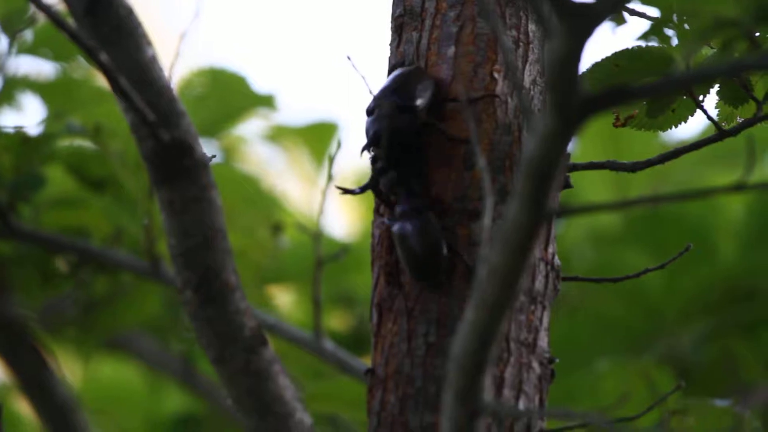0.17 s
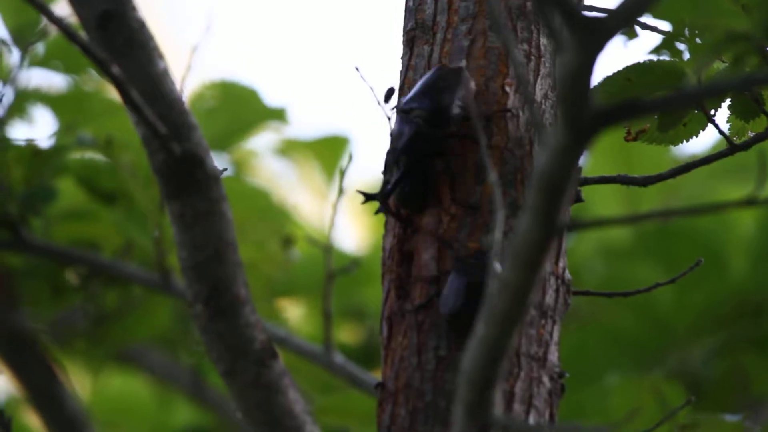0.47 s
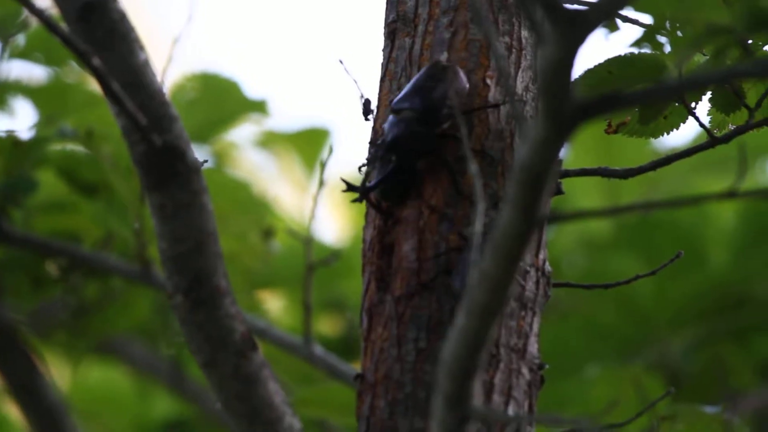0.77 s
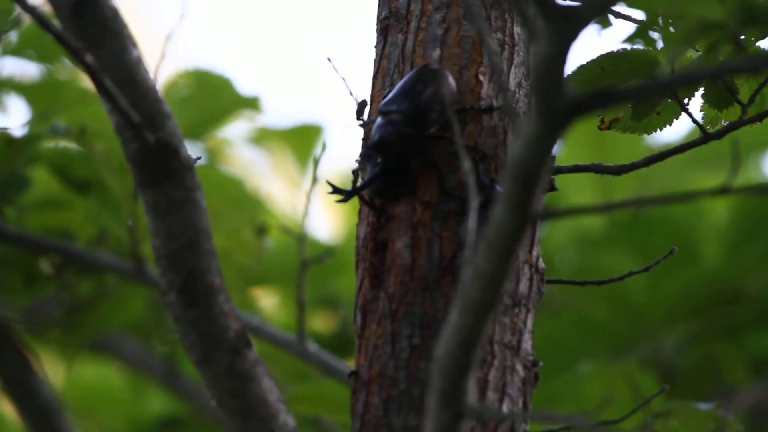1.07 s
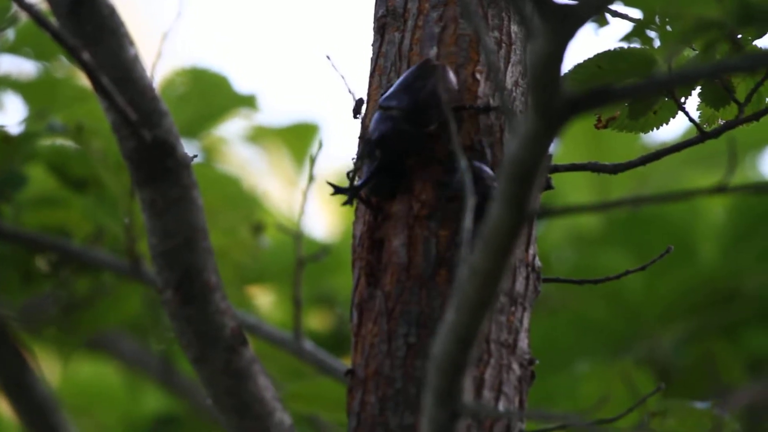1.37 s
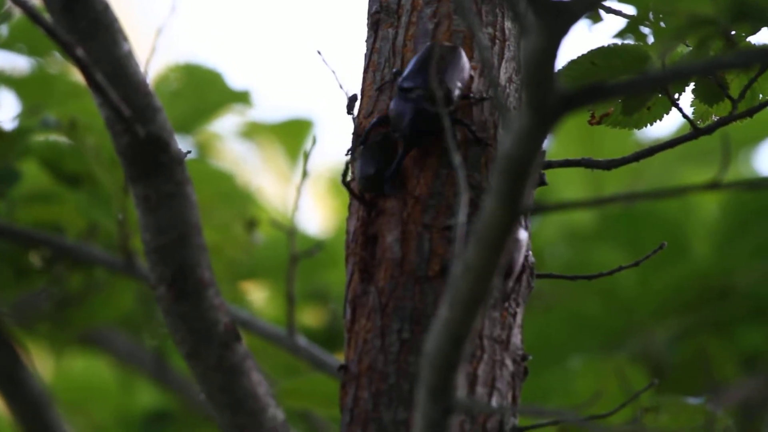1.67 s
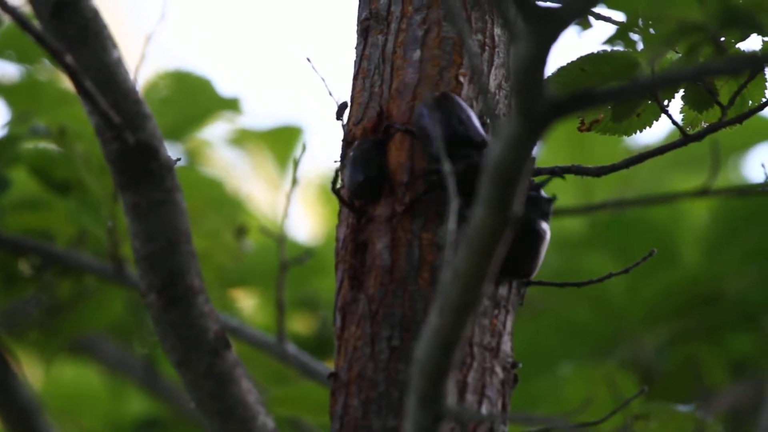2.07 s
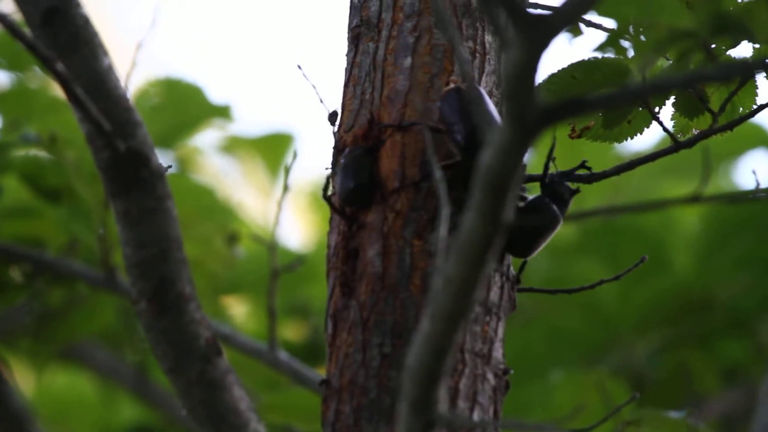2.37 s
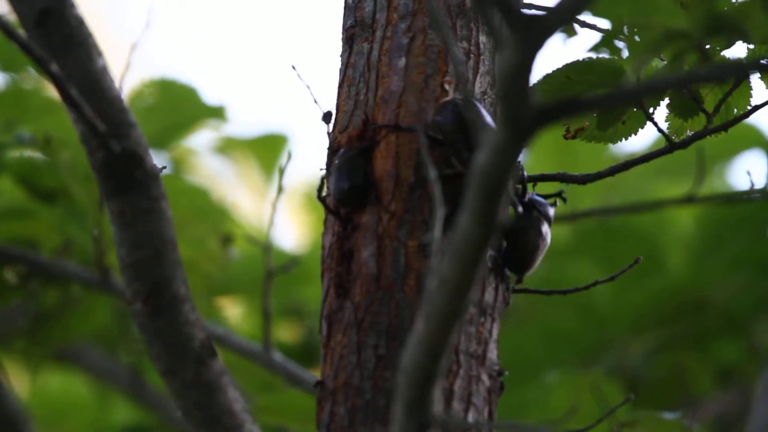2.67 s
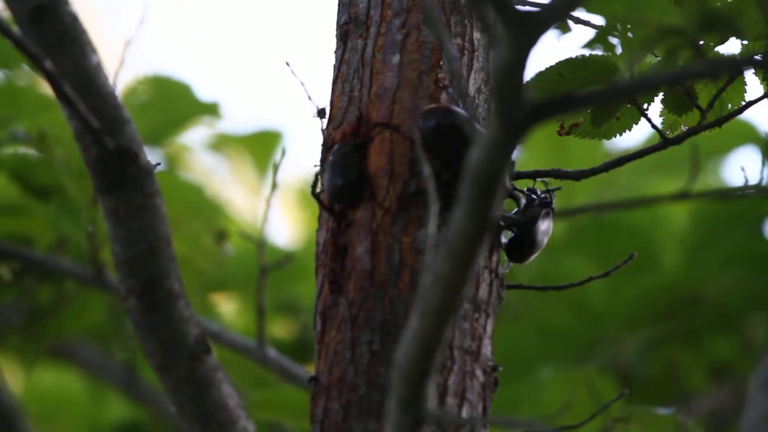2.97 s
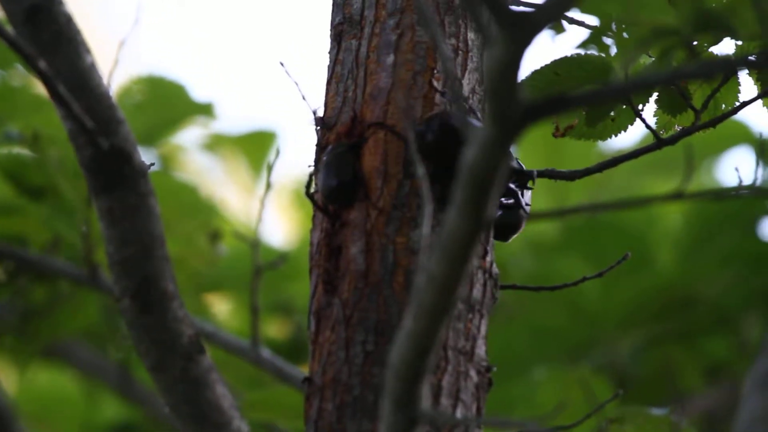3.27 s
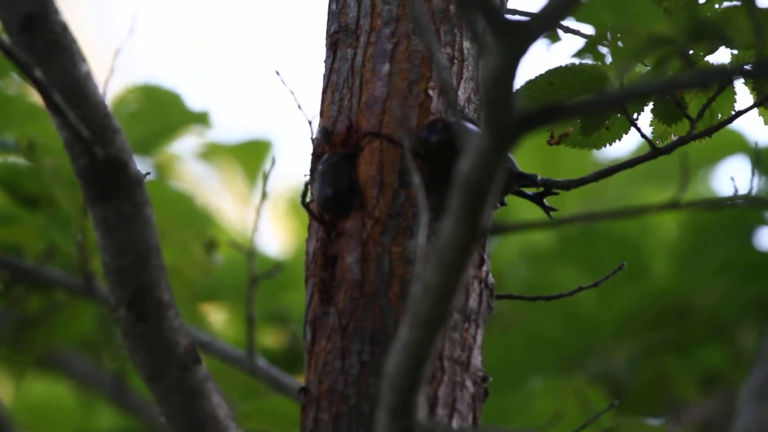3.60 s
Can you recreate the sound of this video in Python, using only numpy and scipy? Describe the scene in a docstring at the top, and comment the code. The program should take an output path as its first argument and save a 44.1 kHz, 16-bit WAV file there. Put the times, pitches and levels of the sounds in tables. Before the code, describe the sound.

Katydids rasp and buzz in a dense high-pitched chorus over faint leaf hiss in summer woods

```python
"""A summer wood through a small mono camera microphone. Out of a brief silence come leaf hiss, a short rustle,
camera-body rumble and a far katydid chorus of dense tooth clicks; cricket trills are narrow resonant bands.
A near katydid soon throbs over it in bursts of sparser clicks. A slower singer then swells to nine strokes a
second, wavering wing tones over a scrape. Two soft knocks excite the body's hum at 1.4 and 2.7 s; near the end
the rasp drops away."""
import sys
import numpy as np
from scipy import signal
from scipy.fft import rfft, irfft
from scipy.io import wavfile

SR = 44100
rng = np.random.default_rng(int(sys.argv[2]) if len(sys.argv) > 2 else 0)


def file_out(sig):
    """Save sig as 16-bit WAV at sys.argv[1]."""
    # one column per channel
    cols = np.atleast_2d(sig).T
    # limit, then scale
    lim = np.clip(cols, -1, 1)
    pcm = np.round(lim * 32767).astype(np.int16)
    wavfile.write(sys.argv[1], SR, pcm)


def convert_level_to_amplitude(level_db):
    """Map a level in decibels to its linear amplitude factor."""
    exponent = np.asarray(level_db, float) / 20
    return 10 ** exponent


N = 164934  # samples, 3.74 s

# Katydid wing spectrum: (frequency [Hz], relative density [dB per Hz])
KATYDID_SPECTRUM = [(6000, -45), (9000, -19), (10400, -13), (11200, -10), (12000, -5.5), (12600, -1.5),
                    (13500, 0), (14300, -.5), (15000, -2.5), (15400, -3.5), (16000, -4)]
# Near katydid, one row a wing stroke: (time of peak [s], height [dB])
NEAR_STROKES = [(0.097, -52), (0.184, -41), (0.265, -46), (0.32, -55), (0.366, -44), (0.426, -43),
                (0.477, -41), (0.627, -42), (0.679, -43), (0.747, -44), (0.805, -40.5), (0.852, -39.5),
                (0.938, -41), (0.994, -43), (1.067, -39), (1.13, -39), (1.203, -40.5), (1.266, -39),
                (1.333, -40.5), (1.402, -37), (1.48, -42.5), (1.543, -37.5), (1.618, -42.5), (1.666, -36),
                (1.722, -38), (1.765, -43), (1.838, -38), (1.904, -38), (1.964, -42), (2.043, -43.5),
                (2.123, -47), (2.193, -38.5), (2.261, -39), (2.304, -40), (2.401, -47.5), (2.542, -39.5),
                (2.611, -41), (2.666, -43.5), (2.762, -40), (2.848, -39), (2.907, -40), (2.963, -41),
                (3.038, -43), (3.103, -42), (3.164, -42.5), (3.218, -45.5), (3.285, -43), (3.347, -45),
                (3.415, -43.5), (3.479, -44.5), (3.546, -47.5), (3.607, -44.5), (3.651, -41), (3.731, -43)]
# Far katydid chorus: (time [s], level [dB])
CHORUS_LEVEL = [(0.05, -42.5), (0.63, -41.5), (2.75, -42.5), (3.09, -44), (3.74, -44)]
# Slow singer, one row a stroke: (time of peak before the pitch climb [s], height [dB])
RASP_STROKES = [(0.179, -79), (0.293, -60), (0.414, -59), (0.529, -55), (0.631, -57), (0.748, -53),
                (0.86, -50), (0.979, -52), (1.097, -51), (1.203, -51), (1.317, -51), (1.424, -50),
                (1.54, -50), (1.653, -54), (1.768, -50), (1.871, -50), (1.977, -49), (2.098, -50),
                (2.192, -51), (2.318, -51), (2.424, -50), (2.531, -51), (2.64, -49), (2.741, -49.5),
                (2.867, -51), (2.973, -51), (3.086, -49.5), (3.193, -49), (3.418, -56.5), (3.659, -75)]
# Narrow wing modes of the slow singer: (frequency [Hz], relative level [dB])
RASP_MODES = [(7725, -80), (7903, -79), (8037, -80), (8183, -80), (8355, -78), (8586, -75), (8775, -79),
              (8912, -80), (9080, -76), (9216, -75), (9512, -75), (10090, -80), (10584, -75), (10779, -76)]
# Broad scrape spectrum of the slow singer: (frequency [Hz], relative density [dB per Hz])
SCRAPE_SPECTRUM = [(7300, -25.5), (7800, -10.5), (8600, 0), (9400, -4), (10600, 1.5), (11800, -1),
                   (13000, -1)]
# Near cricket: (time [s], level [dB])
TRILL_LEVEL = [(0.05, -77), (0.16, -76), (0.18, -70), (0.61, -66.5), (2.76, -64), (2.79, -71), (3.3, -81),
               (3.33, -74), (3.74, -84)]
# Near cricket wing resonances: (frequency [Hz], width of one pass [Hz], relative level [dB])
TRILL_MODES = [(6680, 60, 0), (6762, 55, -1.5)]
# Lower far cricket chorus: (time [s], level [dB])
FAR_LOW_LEVEL = [(0.05, -62), (0.22, -66.5), (0.45, -63), (0.73, -66.5), (0.92, -63), (2.11, -67.5),
                 (2.19, -60), (2.21, -63.5), (2.7, -66), (3.74, -65)]
# Its bands: (frequency [Hz], width of one pass [Hz], relative level [dB])
FAR_LOW_MODES = [(5517, 520, -1), (5823, 360, -2)]
# Higher far cricket: (time [s], level [dB])
FAR_HIGH_LEVEL = [(0.05, -69), (0.87, -69), (0.89, -72), (1.32, -70), (1.35, -75), (1.42, -68), (1.45, -73),
                  (3.74, -70)]
# Its band: (frequency [Hz], width of one pass [Hz], relative level [dB])
FAR_HIGH_MODES = [(7270, 220, 0)]
# Camera-body resonances: (frequency [Hz], width before widening [Hz], relative level [dB])
BODY_MODES = [(316.3, 33, -8.5), (364, 41, -9), (420.5, 60, -15.5), (461.3, 32.6, -5.5), (613, 63, -8),
              (650.2, 76, -3), (745, 37, -9), (799, 41.7, -9.5), (1362, 43, -15.5)]
# Rumble: (time [s], level [dB], tilt of the deep resonances, used relative to its mean [dB])
RUMBLE = [(0.05, -43.5, -9), (0.1, -49.5, -2.5), (0.33, -49.5, -10.5), (0.34, -52, -1), (0.47, -49, -7),
          (0.58, -47.5, -4.5), (0.87, -47.5, -9.5), (1.02, -51.5, -2.5), (1.9, -50, -6), (2.0, -53, -3.5),
          (3.6, -51, -5), (3.74, -54, 5)]
# Soft knocks on the camera: (time [s], starting gain on the body hum [dB])
KNOCKS = [(1.408, -48), (2.677, -42)]
# Leaves, distance and microphone hiss: (frequency [Hz], relative density [dB per Hz])
AIR_SPECTRUM = [(25, -43), (60, -31.5), (150, -18.5), (250, -16.5), (950, -17.5), (2000, -21), (2700, -22),
                (3200, -23.5), (5000, -25.5), (6400, -23.5), (7600, -24), (10000, -21), (12000, -27),
                (16000, -29)]
# Rustle bands: (frequency [Hz], width of one pass [Hz], relative level [dB])
RUSTLE_MODES = [(2960, 190, 9), (3420, 510, 1), (3980, 250, -3), (4400, 420, 3)]

NEAR_TEETH_PER_S, NEAR_SPREAD_DB = 2500, 1.4
NEAR_RISE_S, NEAR_FALL_S = 0.011, 0.007
CHORUS_TEETH_PER_S, CHORUS_SPREAD_DB, CHORUS_FLICKER_DB = 12000, 1, 0.8

RASP_TEETH_PER_S, RASP_SPREAD_DB = 2500, 2.0
RASP_RISE_S, RASP_FALL_S = 0.028, 0.017
RASP_CLIMB_S_PER_KHZ = 0.007
RASP_WAVER_HZ, RASP_UNEVEN_DB = 9, 2.5
RASP_LINES_DB = -5.5  # wing tones against the scrape

TRILL_PER_S, TRILL_JITTER = 113, 0.02  # jitter as a fraction of the pulse rate
TRILL_ROUGH = 0.25  # noise gain beside the pulses
FAR_FLICKER_DB = 0.5

RUMBLE_FLICKER_DB, RUMBLE_SHARED_DB = 1, -0.5
DEEP_BELOW_HZ, BODY_WIDENING = 520, 1.51
KNOCK_DECAY_S = 0.0072

AIR_DB, AIR_FLICKER_DB = -54.5, 0.78
RUSTLE_S, RUSTLE_LENGTH_S, RUSTLE_DB = 0.039, 0.048, -55.5

OPENS_S, OPEN_RAMP_S, CUTOFF_HZ = 0.0345, 0.0011, 15735


def rms_one(x):
    """Scale to rms 1."""
    return x / np.sqrt(np.mean(x ** 2) + 1e-20)


def curve(rows):
    """Turn a level table into a gain envelope, gliding in dB between its points."""
    s, db = np.transpose(rows)
    return convert_level_to_amplitude(np.interp(np.arange(N) / SR, s, db))


def drift(rate_hz):
    """Smooth random wander of spread 1: low-passed noise made at a fortieth of the sample rate."""
    r = np.exp(-80 * np.pi * rate_hz / SR)
    noise = rng.standard_normal(N // 40 + 2002)
    slow = signal.lfilter([1], [1, -2 * r, r * r], noise)[2000:]  # skip the filter's settling
    return np.interp(np.arange(N) / 40, np.arange(len(slow)), rms_one(slow))


def colour(x, spectrum):
    """Shape a flat source with a spectrum drawn over log frequency; rms 1."""
    hz, db = np.transpose(spectrum)
    log_hz = np.log(np.arange(N // 2 + 1) * SR / N + 1)
    gain = convert_level_to_amplitude(np.interp(log_hz, np.log(hz), db))
    return rms_one(irfft(rfft(x) * gain, N))


def resonate(x, hz, width_hz, order=1):
    """Ring a two-pole resonance of about unit peak gain, applied once or more."""
    r = np.exp(-np.pi * width_hz / SR)
    zeros = [(1 - r * r) / 2, 0, (r * r - 1) / 2]
    poles = [1, -2 * r * np.cos(2 * np.pi * hz / SR), r * r]
    for _ in range(order):
        x = signal.lfilter(zeros, poles, x + 1e-18)
    return x


def teeth(per_s, spread_db):
    """Wing teeth struck at random moments: clicks of uneven size and either sign."""
    size = convert_level_to_amplitude(spread_db * np.minimum(rng.exponential(1, N), 4))
    sign = rng.choice([-1, 1], N)
    struck = rng.random(N) < per_s / SR
    return size * sign * struck


def strokes(rows, rise_s, fall_s):
    """Wing-stroke envelope: each stroke swells to its height and drops faster."""
    t, out = np.arange(N) / SR, np.zeros(N)
    for at, db in rows:
        around = slice(max(int((at - 0.15) * SR), 0), int((at + 0.1) * SR))
        lag = t[around] - at
        spread_s = np.where(lag < 0, rise_s, fall_s)
        out[around] += convert_level_to_amplitude(db) * np.exp(-0.5 * (lag / spread_s) ** 2)
    return out


def near_katydid():
    """Sparse tooth clicks, coloured by the wing and swelling with every stroke."""
    clicks = teeth(NEAR_TEETH_PER_S, NEAR_SPREAD_DB)
    return strokes(NEAR_STROKES, NEAR_RISE_S, NEAR_FALL_S) * colour(clicks, KATYDID_SPECTRUM)


def katydid_chorus():
    """Far katydids: tooth clicks so dense that they fuse into a flickering hiss."""
    clicks = teeth(CHORUS_TEETH_PER_S, CHORUS_SPREAD_DB)
    flicker = convert_level_to_amplitude(CHORUS_FLICKER_DB * drift(60))
    return curve(CHORUS_LEVEL) * flicker * colour(clicks, KATYDID_SPECTRUM)


def rasp():
    """Wavering wing modes over a scrape of tooth clicks; higher pitches peak later in the stroke."""
    effort = strokes(RASP_STROKES, RASP_RISE_S, RASP_FALL_S)

    def late(hz):
        """Shift the stroke by pitch: 9 kHz stays put, and the climb stops at 10 kHz."""
        shift_s = RASP_CLIMB_S_PER_KHZ * (min(hz, 10000) / 1000 - 9)
        return np.roll(effort, int(shift_s * SR))

    lines = np.zeros(N)
    for hz, db in RASP_MODES:
        level = convert_level_to_amplitude(db + RASP_UNEVEN_DB * drift(19))
        pitch_hz = hz + RASP_WAVER_HZ * drift(28.7)
        lines += level * np.sin(2 * np.pi * np.cumsum(pitch_hz) / SR) * late(hz)

    clicks = colour(teeth(RASP_TEETH_PER_S, RASP_SPREAD_DB), SCRAPE_SPECTRUM)
    low = signal.sosfiltfilt(signal.butter(3, 8800, fs=SR, output="sos"), clicks)
    scrape = late(8200) * low + late(9700) * (clicks - low)
    effort_rms = np.sqrt(np.mean(effort ** 2))
    return scrape + convert_level_to_amplitude(RASP_LINES_DB) * effort_rms * rms_one(lines)


def near_cricket():
    """Nearly regular pulses and a little noise ring two close wing resonances."""
    rate = TRILL_PER_S * (1 + TRILL_JITTER * drift(30))
    pulses = np.diff(np.floor(np.cumsum(rate) / SR), prepend=0)  # one click a cycle
    drive = rms_one(pulses) + TRILL_ROUGH * rng.standard_normal(N)
    trill = sum(convert_level_to_amplitude(db) * resonate(drive, hz, width, order=2) for hz, width, db in TRILL_MODES)
    return curve(TRILL_LEVEL) * rms_one(trill)


def far_crickets():
    """Two smooth far bands: noise through narrow resonances, flickering slightly."""
    out = np.zeros(N)
    for rows, modes in ((FAR_LOW_LEVEL, FAR_LOW_MODES), (FAR_HIGH_LEVEL, FAR_HIGH_MODES)):
        band = sum(convert_level_to_amplitude(db) * resonate(rng.standard_normal(N), hz, width, order=2)
                   for hz, width, db in modes)
        out += convert_level_to_amplitude(FAR_FLICKER_DB * drift(45)) * curve(rows) * rms_one(band)
    return out


def camera_body():
    """Rumble and knocks: noise rings hollow body resonances, each wandering a little on its own."""
    t = np.arange(N) / SR
    s, level_db, deep_db = np.transpose(RUMBLE)
    deep = np.interp(t, s, deep_db - deep_db.mean())
    shared = RUMBLE_SHARED_DB * drift(15)
    white = rng.standard_normal((2, N))  # neighbouring resonances take alternate noises
    hum = np.zeros(N)
    for k, (hz, width, db) in enumerate(BODY_MODES):
        wander = shared + RUMBLE_FLICKER_DB * drift(10.5)
        gain = convert_level_to_amplitude(db + wander + deep * (hz < DEEP_BELOW_HZ))
        hum += gain * resonate(white[k % 2], hz, width * BODY_WIDENING, order=2)
    knocks = sum(convert_level_to_amplitude(db) * (t > at) * np.exp(-np.abs(t - at) / KNOCK_DECAY_S) for at, db in KNOCKS)
    return rms_one(hum) * (convert_level_to_amplitude(np.interp(t, s, level_db)) + knocks)


def rustle():
    """One brief flat-topped puff of noise through a few resonant bands."""
    t = np.arange(N) / SR
    half_s = RUSTLE_LENGTH_S / 2
    puff = np.exp(-((t - RUSTLE_S - half_s) / half_s) ** 4)
    white = rng.standard_normal(N)
    bands = sum(convert_level_to_amplitude(db) * resonate(white, hz, width, order=2) * (-1) ** k  # alternate polarity
                for k, (hz, width, db) in enumerate(RUSTLE_MODES))
    return convert_level_to_amplitude(RUSTLE_DB) * puff * rms_one(bands)


def air():
    """The broad floor of leaves, distance and microphone hiss: coloured noise with a slight flicker."""
    level = convert_level_to_amplitude(AIR_DB + AIR_FLICKER_DB * drift(9.7))
    return level * colour(rng.standard_normal(N), AIR_SPECTRUM)


def scene():
    """All sources at one microphone, the same on both channels."""
    insects = near_katydid() + katydid_chorus() + rasp() + near_cricket() + far_crickets()
    mono = insects + camera_body() + rustle() + air()
    return np.stack([mono, mono])


def top_cut(x):
    """Nothing passes above the cut-off."""
    return signal.sosfilt(signal.butter(12, 16710, fs=SR, output="sos"), x)


def record(dry):
    """The sound opens after a short silence and loses its top to a steep low-pass."""
    opened = dry * np.clip((np.arange(N) / SR - OPENS_S) / OPEN_RAMP_S, 0, 1)
    steep = signal.ellip(14, 0.3, 75, CUTOFF_HZ, fs=SR, output="sos")
    mix = signal.sosfilt(steep, opened)
    return top_cut(mix)


dry = scene()
out = record(dry)
file_out(out)
```